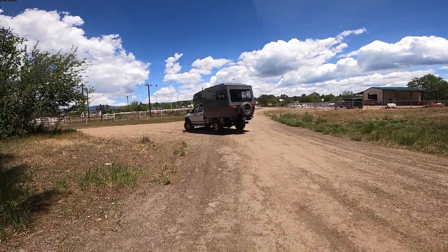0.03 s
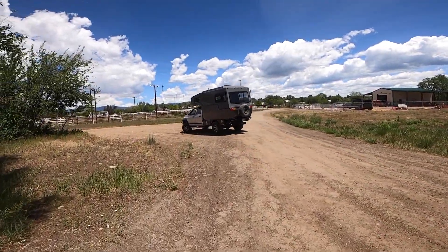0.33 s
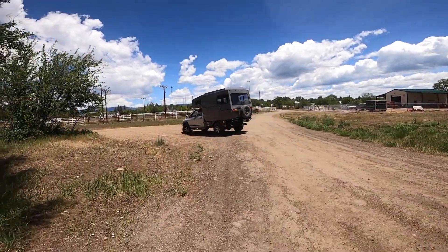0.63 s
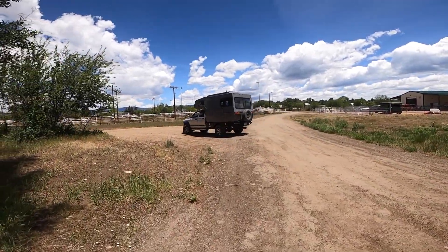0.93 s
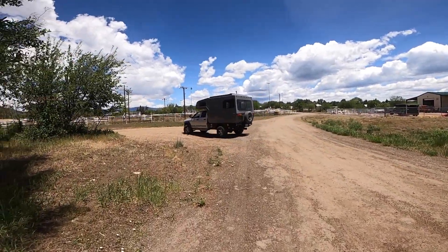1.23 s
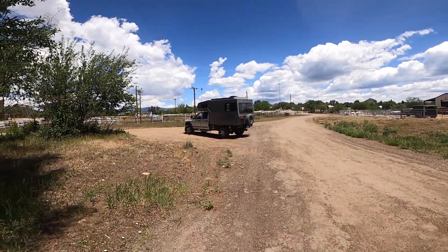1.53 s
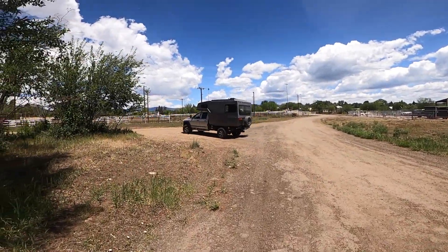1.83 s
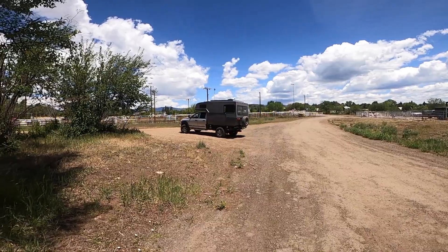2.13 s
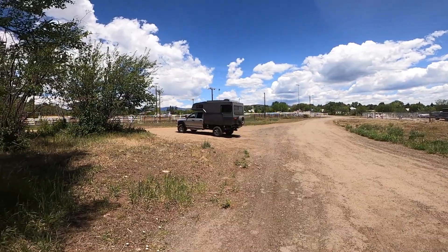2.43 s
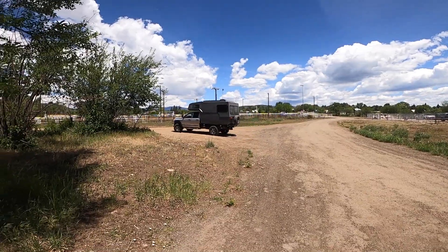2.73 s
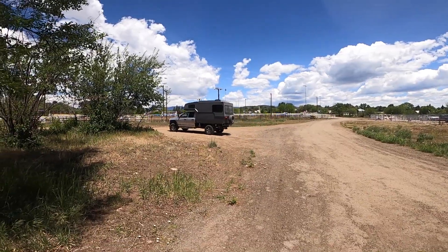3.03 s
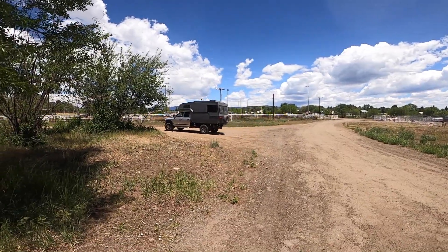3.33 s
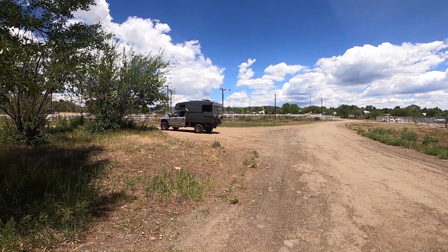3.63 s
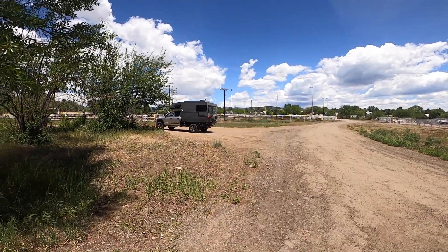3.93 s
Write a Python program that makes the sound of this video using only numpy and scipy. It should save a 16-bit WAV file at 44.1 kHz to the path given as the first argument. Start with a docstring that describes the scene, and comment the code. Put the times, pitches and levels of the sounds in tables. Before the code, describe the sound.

A diesel truck rumbles off over gravel, with stones popping under its tyres.

```python
"""Diesel camper on a dirt road

A six-cylinder truck pulls away and turns off: periodic firing makes its exhaust throb, and its turbo
whistles faintly. The tyres roar and crunch on grit, and stones pop against the underbody as damped
impacts. A bird chirps, and gusts thump mainly on the left microphone port.
The sound drops out for an instant half a second in."""
import sys
import numpy as np
from scipy import signal
from scipy.fft import rfft, irfft, next_fast_len
from scipy.io import wavfile
from scipy.ndimage import map_coordinates

SR = 44100
rng = np.random.default_rng(int(sys.argv[2]) if len(sys.argv) > 2 else 0)


def transcribe(u):
    """Save the signal u as a 16-bit wav file named by the first command-line argument.

    u: samples, shape (n,) or (channels, n), limited to [-1, 1]; the rate is SR.
    q: integer samples, one column per channel.
    """
    v = np.clip(np.atleast_2d(u).T, -1, 1)
    q = np.round(v * 32767).astype(np.int16)
    wavfile.write(sys.argv[1], SR, q)


N = 176400


def amp(db):
    """Amplitude ratio of a level: a factor of ten per 20 dB."""
    return 10 ** (np.asarray(db) / 20)


def unit(x):
    """Normalisation to an rms of 1."""
    return x / np.sqrt(np.mean(x ** 2) + 1e-20)


def along(points, hz):
    """Interpolation of (f/Hz, value) points on a logarithmic frequency axis."""
    f, values = np.transpose(points)
    return np.interp(np.log(hz + 1), np.log(f + 1), values)


def curves(rows):
    """Linear interpolation in time: one value per sample for each column after t/s."""
    times, *columns = np.transpose(rows)
    return [np.interp(np.arange(N) / SR, times, column) for column in columns]


def wobble(rate, size=N):
    """Smooth random modulation: a spline through rate Gaussian knots a second."""
    coarse = np.arange(0, size + 16, 16)
    knots = rng.standard_normal(int(size * rate / SR) + 4)
    return np.interp(np.arange(size), coarse, map_coordinates(knots, [coarse * rate / SR]))


def filtered(x, response):
    """Linear filtering: the spectrum of x times a frequency response."""
    n = x.shape[-1]
    padded = next_fast_len(n + 8192)
    return irfft(rfft(x, padded) * response(np.fft.rfftfreq(padded, 1 / SR)), padded)[..., :n]


def add(out, s, x):
    """Superposition of x on out, starting at s seconds."""
    part = out[:, max(round(s * SR), 0):][:, :x.shape[-1]]
    part += x[..., :part.shape[1]]


# Likeness of the left and right channels: f/Hz, correlation
CORRELATION = [(130, 0.99), (640, 0.93), (1400, 0.84), (3100, 0.75), (6800, 0.22), (15000, 0.17)]
def spread(pair, spectrum):
    """Partial coherence: two independent signals, as mid and side, give coloured stereo of rms 1."""
    def response(hz):
        angle = np.arccos(np.clip(along(CORRELATION, hz), -1, 1)) / 2
        return amp(along(spectrum, hz)) * [np.cos(angle), np.sin(angle)]
    mid, side = filtered(pair, response)
    return unit(np.array([mid + side, mid - side]))


def noise(spectrum, size=N):
    """Spectral shaping of white noise into stereo of rms 1; only relative levels count."""
    return spread(rng.standard_normal((2, size)), spectrum)


# Bird calls: t/s, duration/s, start f/Hz, end f/Hz, level/dB
BIRD_CALLS = [(0.057, 0.085, 6700, 6600, -48), (0.143, 0.063, 6070, 5500, -44),
              (0.255, 0.048, 4780, 4400, -41.5), (3.613, 0.061, 5420, 4430, -47),
              (3.747, 0.045, 5600, 4700, -43), (3.822, 0.044, 6750, 5950, -49.5)]
def bird():
    """Frequency modulation: a downward glide makes each chirp, and fast jitter makes it raspy."""
    out = np.zeros((2, N))
    for s, duration, start_hz, end_hz, db in BIRD_CALLS:
        progress = np.linspace(0, 1, int(duration * SR))
        hz = start_hz + (end_hz - start_hz) * progress + 280 * wobble(600, len(progress))
        envelope = amp(db - 3) * np.sqrt(2 * np.abs(np.sin(np.pi * progress)))
        add(out, s, envelope * np.sin(2 * np.pi * np.cumsum(hz) / SR))
    return out


# Spectrum of the breeze: f/Hz, level/dB
BREEZE_SPECTRUM = [(10, -14), (28, -8), (60, -2.5), (150, -17.5), (300, -31), (800, -66)]
def breeze():
    """Turbulent pressure, independent at the two ports, gives a low rumble that slowly swells."""
    envelope = amp(-34 + 6 * wobble(6.95))
    rumble = filtered(rng.standard_normal((2, N)), lambda hz: amp(along(BREEZE_SPECTRUM, hz)))
    return envelope * unit(rumble)


# Eddies striking the ports: t/s, level/dB, Gaussian width/s, upper edge f/Hz
EDDIES = [(1.502, -14, 0.02, 55), (1.61, -18, 0.03, 54), (1.969, -12, 0.02, 70), (2.311, -8, 0.044, 80),
          (2.353, -3.5, 0.0058, 215), (2.44, -3, .013, 86), (2.523, -6.5, 0.0033, 274),
          (2.58, -4, .016, 69), (2.969, -7, 0.034, 70.4), (3.105, -8, 0.015, 55), (3.411, -6, 0.016, 55)]
def gusts():
    """A passing eddy is a pulse of low-frequency pressure: a thump, stronger at the left port."""
    out, t = np.zeros((2, N)), np.arange(-SR // 8, SR // 8) / SR
    for s, db, width, edge_hz in EDDIES:
        bell = np.exp(-(t / width) ** 2 / 2)
        burst = bell * rng.standard_normal((2, len(t)))
        eddy = filtered(burst, lambda hz: hz ** 2 / (hz ** 2 + 22 ** 2) / (1 + (hz / edge_hz) ** 3))
        eddy *= np.linalg.norm(bell) / np.linalg.norm(eddy, axis=1, keepdims=True)
        add(out, s + t[0], amp(db - 1.5) * eddy * amp([[0], [-7]]))
    return out


# Turbo whistle: t/s, f/Hz, level/dB
WHISTLE = [(.53, 6780, -72), (.58, 6940, -57), (.72, 7390, -59), (.99, 7390, -61), (1.1, 7200, -85),
           (1.8, 7180, -70), (2.05, 7350, -61), (2.3, 7250, -56), (2.52, 7160, -51), (2.57, 7010, -59),
           (3, 6580, -78), (3.27, 6780, -59), (3.39, 7080, -61), (3.5, 7300, -80)]
def turbo():
    """Random frequency and amplitude modulation make the turbo's thin tone flutter."""
    hz, db = curves(WHISTLE)
    phase = 2 * np.pi * np.cumsum(hz + 42 * wobble(220)) / SR
    flutter_db = 3.7 * np.array([wobble(50), wobble(50)])
    return np.sqrt(2) * np.sin(phase) * amp(db + flutter_db)


# Sprays of grit: t/s, level/dB
SPRAY_EVENTS = [(0.7205, -32.5), (1.257, -26), (1.6447, -29), (3.2041, -27.5)]
# Spectrum of their hiss: f/Hz, level/dB
SPRAY_SPECTRUM = [(1000, -18), (3000, -2.5), (5000, -2.5), (8000, -13), (11000, -28.5), (15000, -59.5)]
def sprays(rise_s=.001, t60=.08):
    """Flung grit hisses as a burst of noise with exponential decay."""
    out, t = np.zeros((2, N)), np.arange(SR // 5) / SR
    envelope = amp(-4 - 60 * t / t60) * (1 - np.exp(-t / rise_s))
    for s, db in SPRAY_EVENTS:
        add(out, s, amp(db) * envelope * noise(SPRAY_SPECTRUM, len(t)))
    return out


# Gravel scrubbed sideways as the truck turns: t/s, level/dB
GRAVEL_SCRUB = [(0, -41), (.4, -43), (1.05, -42.5), (1.3, -35.5), (1.6, -39.5), (1.95, -36), (2.3, -37.5),
                (2.45, -42), (2.75, -42), (3.05, -41), (3.4, -48), (4, -63)]
def pebbles(per_s=400, centre_hz=2148, t60=.016, top_hz=7000):
    """Free vibration after impact: each colliding pebble rings briefly at its own frequency."""
    out, t = np.zeros((2, N)), np.arange(SR // 25) / SR
    sides = np.array([[1], [-1]])
    for when, size, pitch, pan, lag in rng.random((int(per_s * N / SR), 5)):
        hz = centre_hz * 2 ** (.45 * np.arctanh(1.98 * (pitch - .5)))
        db = 4.5 * min(-np.log(1 - size), 3)  # capped exponential distribution: most clicks are weak
        ring = amp(db - 60 * t / t60) * np.sin(2 * np.pi * hz * t + sides * (lag - .5))
        add(out, when * N / SR, ring * (1 + sides * (pan - .5)))
    clicks = filtered(out, lambda hz: 1 / (1 + (hz / top_hz) ** 6))
    return unit(clicks) * amp(curves(GRAVEL_SCRUB)[0])


# Loud cracks under the treads: t/s, level/dB
LOUD_CRACKS = [(1.143, -13), (1.242, -12), (1.302, -13), (1.377, -6), (1.631, -14), (1.765, -12),
               (2.989, -17), (3.005, -10), (3.054, -9), (3.63, -13)]
def cracks(per_s=130, centre_hz=1250, t60=.0035, top_hz=4200):
    """Heavy damping: stones give way in dry clicks, a few loud, many small ones following the scrub."""
    out, t = np.zeros((2, N)), np.arange(SR // 100) / SR
    when, sizes = rng.random((int(per_s * N / SR), 2)).T
    times = when * N / SR
    excess_db = 9 + 3.5 * np.minimum(-np.log(1 - sizes), np.e)
    levels = np.interp(times, *np.transpose(GRAVEL_SCRUB)) + excess_db
    for s, db in [*LOUD_CRACKS, *zip(times, levels)]:
        hz = centre_hz * 2 ** (.35 * rng.normal())
        add(out, s, np.sqrt(2) * amp(db - 60 * t / t60) * np.cos(2 * np.pi * hz * t))
    return filtered(out, lambda hz: 1 / (1 + (hz / top_hz) ** 4))


# Stones striking the tyres and underbody: t/s, level/dB, relative treble level/dB, ring f/Hz
STONE_HITS = [(0.168, -18, -3, 900), (0.237, -18, -15.5, 1320), (0.425, -12, -19, 870),
              (0.651, -12, -20, 770), (0.681, -17, -11.5, 895), (0.859, -11, -21, 788),
              (1.156, -9.5, -16, 537), (1.324, -17, -8, 1100), (1.358, -11, -12, 1160),
              (1.378, -8.5, -12, 1010), (1.43, -7, -11.5, 847), (1.501, -13.5, -15, 490),
              (1.72, -9, -14.5, 940), (1.765, -13, -9, 586), (2.168, -17.5, -5.5, 1500),
              (2.507, -17, -13.5, 1310), (3.004, -14.5, -20.5, 1050), (3.663, -13, -15, 900),
              (3.85, -10.5, -25, 596)]
# Spectrum of a hit's dull body: f/(ring f), level/dB
BODY_SPECTRUM = [(.2, -35.5), (.45, -5.5), (1, 3), (1.5, -2.5), (2.4, -16), (4.5, -33), (11, -73.5)]
# Spectrum of its bright edge: f/Hz, level/dB
EDGE_SPECTRUM = [(500, -27), (1500, 4), (2600, -5), (4500, -14.5), (7000, -22.5), (12000, -53.5)]
def knocks(thud_t60=.018, rattle_t60=.14, ring_t60=.02):
    """Impact excitation: each stone gives a noisy thud, a brief rattle and one damped mode."""
    out, t = np.zeros((2, N)), np.arange(SR // 5) / SR
    attack = 1 - np.exp(-t / .0004)
    decay = amp(-60 * t / thud_t60) + amp(-13.5 - 60 * t / rattle_t60)
    for s, db, treble_db, hz in STONE_HITS:
        body = noise(np.array(BODY_SPECTRUM) * [hz, 1], len(t))
        edge = amp(treble_db + 8) * noise(EDGE_SPECTRUM, len(t))
        thud = amp(-6.5) * attack * decay * (body + edge)
        ring = amp(-2.5 - 60 * t / ring_t60) * np.sin(2 * np.pi * hz * t)
        add(out, s, amp(db) * (thud + ring))
    return out


# Spectrum of crunching grit: f/Hz, level/dB
CRUNCH_SPECTRUM = [(400, -17), (1400, -3), (2000, -5), (2700, -1.5), (3500, -4.5), (4500, -5),
                   (5500, -11.5), (7000, -17), (8500, -24), (10000, -33.5), (12000, -46.5), (15000, -60.5)]
def crunch(clatter, grains_per_s=260, t60=.013):
    """Incoherent addition: grains crack at random and their powers sum, over a pulsing hiss."""
    onsets = rng.random(N) < grains_per_s / SR
    impulses = onsets * amp(1.5 * np.minimum(rng.exponential(size=N), 4))
    power_decay = amp(-120 * np.arange(SR // 10) / SR / t60)
    power = signal.fftconvolve(impulses ** 2, power_decay)[:N]
    grit = spread(np.sqrt(np.abs(power)) * rng.standard_normal((2, N)), CRUNCH_SPECTRUM)
    return unit(clatter * noise(CRUNCH_SPECTRUM) + amp(-3.5) * grit)


# Course of the road noise: t/s, roar level/dB, crunch level/dB
ROAD_LEVELS = [(0, -29, -33.5), (.32, -28, -37), (1.05, -28, -36), (1.41, -24.5, -31.5), (1.48, -29, -34),
               (1.7, -28.5, -37), (1.95, -27, -33), (2.36, -29, -35), (2.42, -32, -37.5), (2.8, -33.5, -35),
               (3.06, -26.5, -33.5), (3.36, -34.5, -37), (3.69, -32, -37.5), (4, -33.5, -36.5)]
# Spectrum of the roar of tyres and engine bay: f/Hz, level/dB
ROAR_SPECTRUM = [(100, -14), (320, -8.5), (430, 2.5), (590, -1), (720, -1.5), (890, 1.5), (1000, -1.5),
                 (1340, -3), (1510, -9), (1680, -8), (1930, -16), (2200, -11), (4000, -38.5), (9000, -68)]
def road(cycle):
    """Amplitude modulation: roar and crunch share random jolts and diesel clatter at the firing rate."""
    roar_db, crunch_db = curves(ROAD_LEVELS)
    clatter = 1 + .11 * np.cos(2 * np.pi * 6 * cycle)
    jolts = wobble(34.92)
    roar = noise(ROAR_SPECTRUM) * clatter * amp(roar_db - 2 + 1.3 * jolts + .9 * wobble(70))
    grit = crunch(clatter) * amp(crunch_db - 1.5 + .27 * jolts + 1.1 * wobble(25.04))
    return roar + grit * amp([[.45], [-.45]])


# Engine cycle rate: t/s, f/Hz
CYCLE_RATE = [(0.0, 6.1347), (0.35, 6.326), (0.8, 6.2343), (1.1, 6.451), (1.3, 6.3217), (1.55, 6.121),
              (2.0, 6.276), (2.45, 5.996), (2.75, 6.1763), (3.3, 6.2463), (4.0, 6.2117)]
def engine_cycles(first_beat=.116):
    """Phase is the integral of frequency; one cycle is two crank turns and fires all six cylinders."""
    return np.cumsum(curves(CYCLE_RATE)[0] * live()) / SR - first_beat


# Exhaust harmonics: multiple of the cycle rate, level/dB
HARMONICS = [(6, -21), (7, -35), (9, -35), (12, -20.3), (14, -37), (15, -21), (16, -36), (17, -31.5),
             (18, -16.7), (20, -37), (21, -27.5), (23, -37), (24, -37), (26, -32), (27, -34.5), (30, -32.5),
             (31, -37), (33, -29.5), (35, -42), (36, -38.5), (39, -43), (41, -44)]
# Spectrum of turbulent gas in the pipe: f/Hz, level/dB
GAS_SPECTRUM = [(20, -17.5), (45, -6.5), (110, 2.5), (160, -1), (255, -9), (300, -18), (500, -40.5),
                (1000, -86.5)]
# Course of the exhaust: t/s, level/dB
EXHAUST_LEVELS = [(0, 1), (.45, 3.5), (1.1, 1), (1.4, -0.1), (2, -0.5), (2.7, -0.9), (3.3, -0.7), (4, -1.5)]
def exhaust(cycle, resonance_hz=129, width_hz=20):
    """A harmonic series over puffs of gas: strong and weak firings alternate, three beats a cycle."""
    tone = np.zeros(N)
    mean_cycle_hz = np.mean(CYCLE_RATE, axis=0)[1]
    for order, db in HARMONICS:
        hz = order * mean_cycle_hz
        if order % 3:  # the lope of unequal cylinders
            lag = rng.uniform(0, 2 * np.pi)
        else:  # the beat, delayed around the pipe's main resonance
            lag = 2 * np.arctan2(hz * width_hz, resonance_hz ** 2 - hz ** 2)
        amplitude = np.sqrt(2) * amp(db + .6 * wobble(8.1))
        tone -= amplitude * np.cos(2 * np.pi * order * cycle - lag + .15 * wobble(9))
    gas = amp(-24) * noise(GAS_SPECTRUM) * (1 + .1 * np.cos(2 * np.pi * 3 * cycle))
    envelope = amp(curves(EXHAUST_LEVELS)[0] + .4 * wobble(14))
    return envelope * (tone + gas) * amp([[.5], [-.5]])


def live(start_s=.510, end_s=.531):
    """A rectangular gate, false while the sound drops out."""
    t = np.arange(N) / SR
    return (t < start_s) | (t > end_s)


def scene(left_lag_s=4.5e-5):
    """Superposition with an arrival-time difference: the truck reaches the right port first."""
    cycle = engine_cycles()
    truck = exhaust(cycle) + road(cycle) + pebbles() + cracks() + knocks() + sprays() + turbo()
    truck = filtered(truck, lambda hz: np.exp(1j * np.pi * hz * left_lag_s * np.array([[-1], [1]])))
    return truck + breeze() + gusts() + bird()


def record(dry, top_hz=15500):
    """Clipping at full scale, gating for the dropout, then band limiting."""
    return filtered(np.clip(dry, -1, 1) * live(), lambda hz: hz < top_hz)


dry = scene()
out = record(dry)
transcribe(out)
```